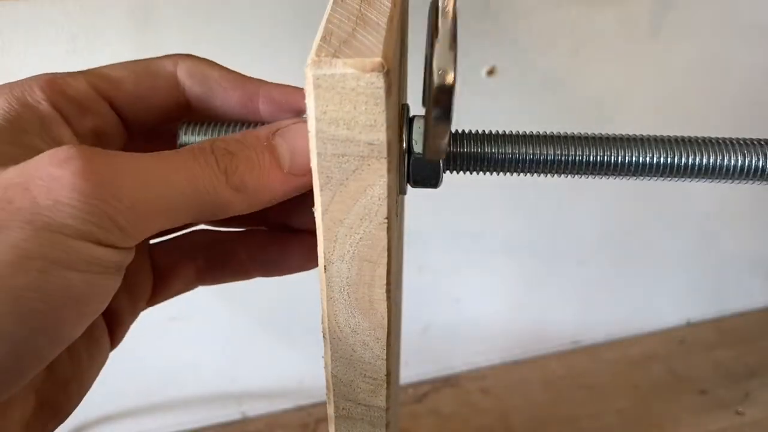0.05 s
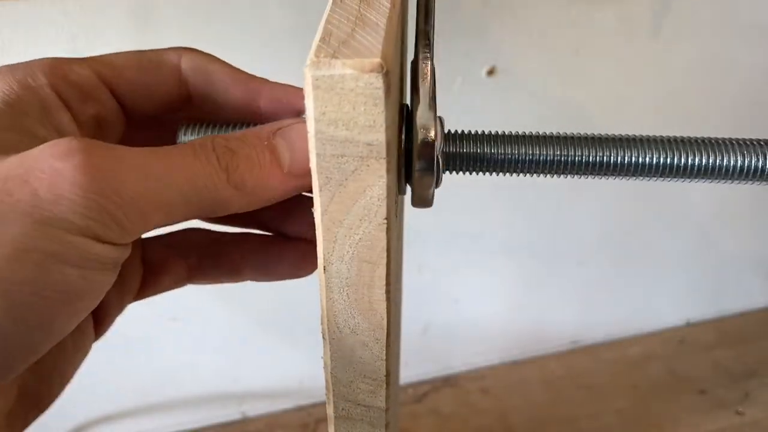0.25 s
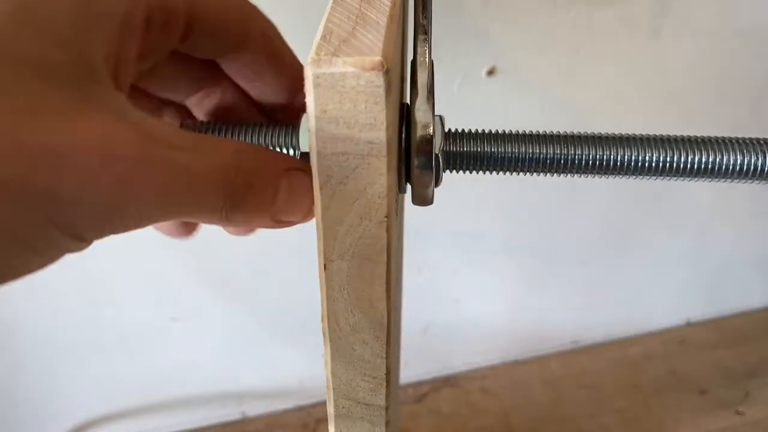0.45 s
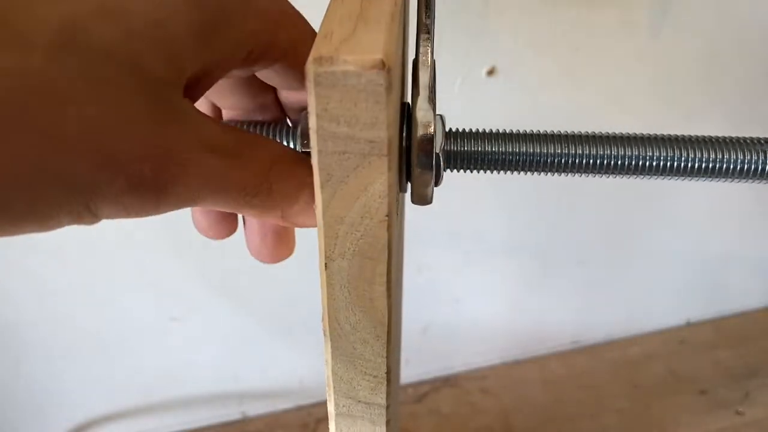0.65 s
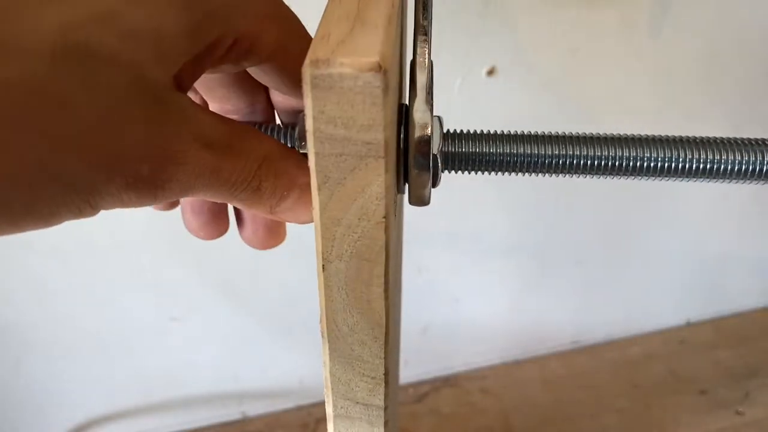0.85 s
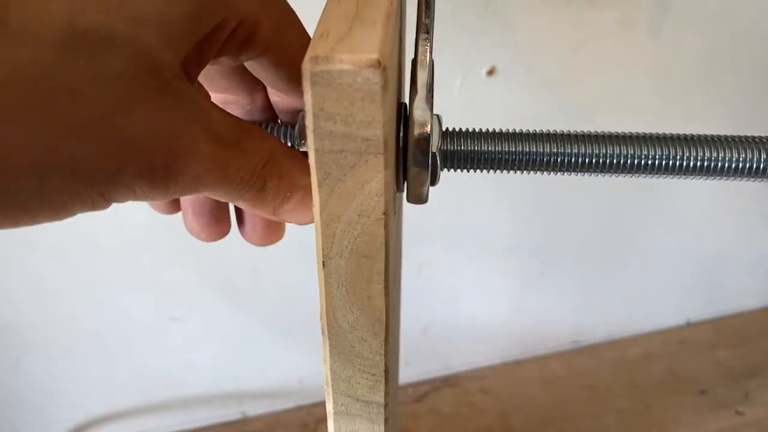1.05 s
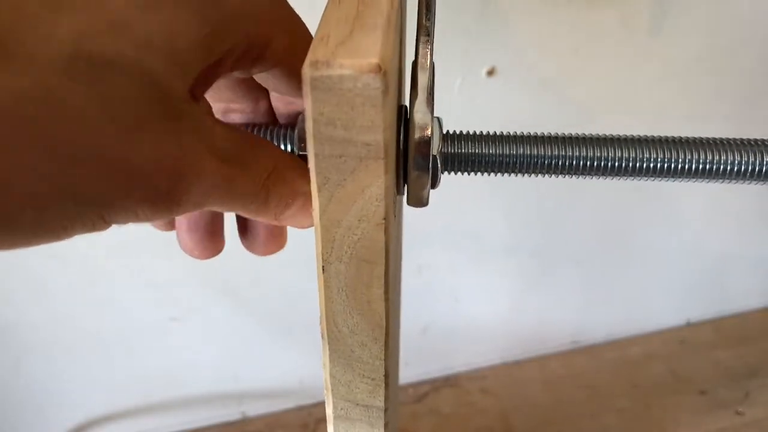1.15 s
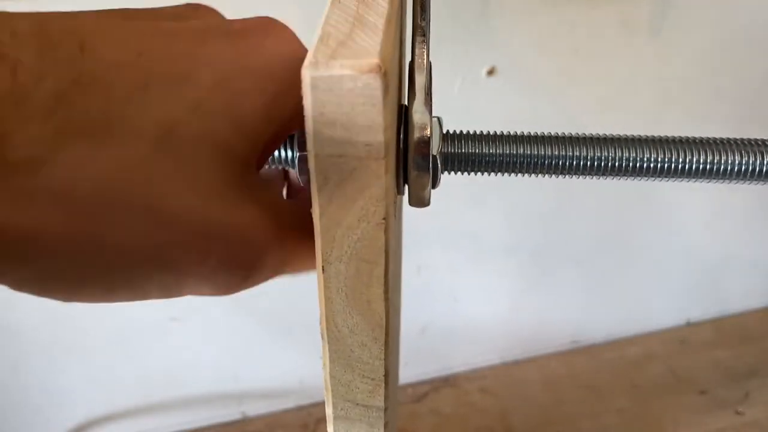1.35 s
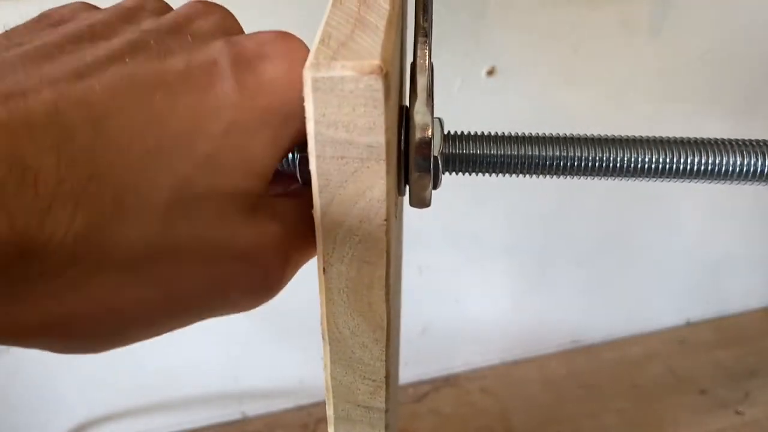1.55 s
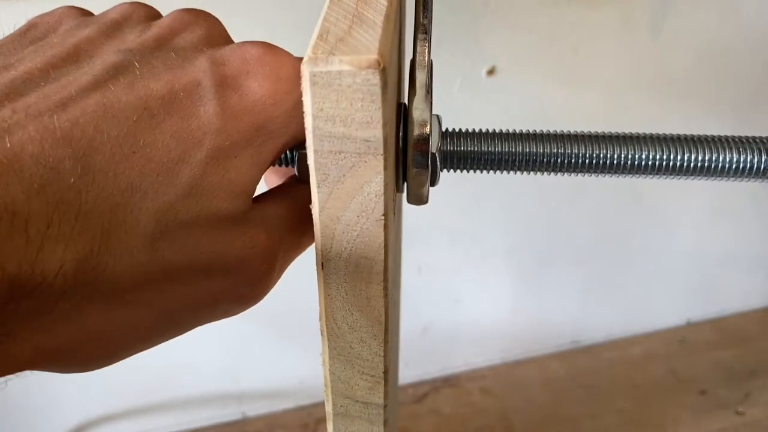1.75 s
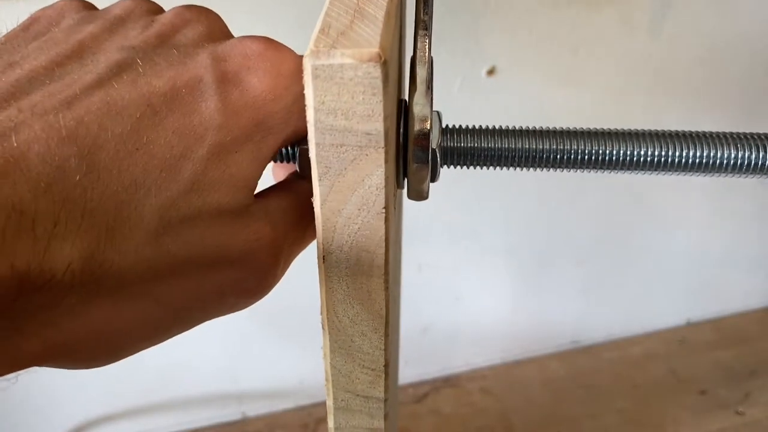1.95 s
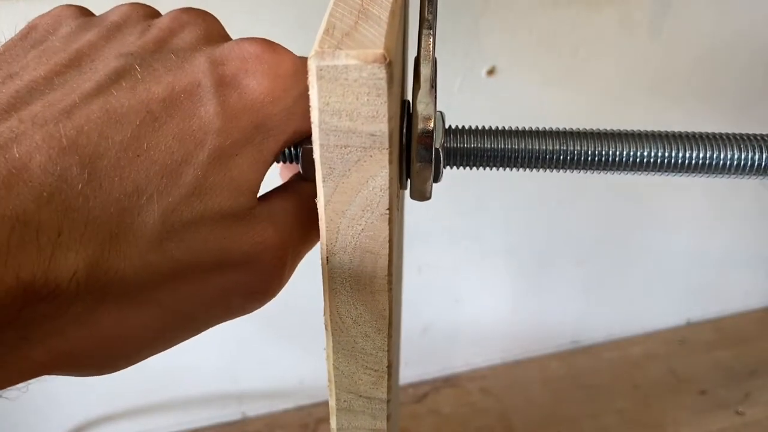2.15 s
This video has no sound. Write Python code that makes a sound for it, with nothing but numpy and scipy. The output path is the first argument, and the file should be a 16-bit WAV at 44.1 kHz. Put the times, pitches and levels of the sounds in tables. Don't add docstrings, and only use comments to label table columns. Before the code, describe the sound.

Close stereo phone pickup of a washer, nut and spanner clicking against wood and a threaded rod in two short bursts within the first second, followed by muffled floor thuds over faint room air.

```python
import sys
import numpy as np
from scipy import signal
from scipy.fft import rfft, irfft
from scipy.io import wavfile
from scipy.ndimage import uniform_filter1d

SR = 44100
rng = np.random.default_rng(int(sys.argv[2]) if len(sys.argv) > 2 else 0)


def put_to_file(sound):
    columns = np.atleast_2d(sound).T
    safe = np.clip(columns, -1, 1)
    whole_steps = np.round(safe * 32767)
    wavfile.write(sys.argv[1], SR, whole_steps.astype(np.int16))


def gain_from_db(level_db):
    decades = np.asarray(level_db, float) / 20
    return 10 ** decades


N = 97020
PORT_LAG = 12

# t/s, blow level/dB, chatter/s, colour f/Hz, ring level/dB
WASHER_HITS = [(0.0799, -30.5, 0.012, 3540, -10.5), (0.0832, -28.5, 0.004, 3080, -9),
               (0.0851, -31.5, 0.0058, 2000, -9.5), (0.086, -34, 0.0061, 910, -45),
               (0.1121, -30.5, 0.0057, 3040, -14), (0.116, -32.5, 0.0059, 1000, -20),
               (.1255, -36, 0.015, 2780, -13), (.134, -35, 0.021, 2160, -17),
               (0.176, -41, 0.0097, 1000, -15), (0.1803, -34.5, 0.013, 2860, -20),
               (.19, -36.5, 0.043, 1200, -23.5), (0.1942, -35.5, 0.002, 3000, -25),
               (0.1995, -32.5, 0.0034, 3220, -14), (0.2029, -31, 0.0028, 3020, -19.5),
               (0.207, -35, 0.0068, 2800, -19.5), (0.3542, -39.5, 0.0027, 3070, -45.5),
               (0.356, -36.5, 0.019, 497, -43.5)]
# t/s, blow level/dB, chatter/s, colour f/Hz, ring level/dB
SLAMS = [
    (.2189, -9.5, .0035, 3190, -21.5),
    (0.2227, -11, 0.0017, 2000, -20.5),
    (.229, -21, .007, 1700, -24),
    (0.8337, -12.5, 0.00093, 3010, -38),
    (0.836, -20, 0.0023, 2000, -51),
]
# t/s, blow level/dB, chatter/s, colour f/Hz, ring level/dB
NUT_HITS = [
    (0.6582, -38, 0.012, 4000, -1),
    (.666, -38, .01, 2800, -9),
]
# t/s, blow level/dB, chatter/s, colour f/Hz, ring level/dB
CATCH_HITS = [
    (0.6738, -31, 0.007, 1600, -24),
]
# t/s, blow level/dB, chatter/s, colour f/Hz, ring level/dB
ROD_HITS = [
    (0.7447, -43, 0.006, 3120, -9.5),
    (0.751, -40.5, 0.04, 1100, -43),
]
# t/s, blow level/dB, chatter/s, colour f/Hz, ring level/dB
SPANNER_HITS = [
    (0.8011, -32, 0.0063, 3240, -31),
    (0.8077, -27, 0.017, 4145, 1.5),
    (.8125, -27.5, 0.0059, 2500, -11.5),
    (0.8192, -25, 0.0066, 4670, -4.5),
    (.826, -29, 0.0065, 2000, -15.5),
    (1.87, -54, 0.0033, 3010, -45),
]
# f/Hz, level/dB, t60/s
BOARD = [(318, -10, .04), (490, -8, 0.04), (662, -5, 0.035), (870, -8, 0.03), (1005, -7, .03),
         (1192, -6, .03), (1412, -13, .03), (1675, -4, .035), (1770, 1, .028), (1900, -4, .028),
         (2235, 0, .028), (2480, -3, 0.035), (2985, -5, .035), (3500, -3, .03),
         (3720, -10.5, 0.03), (3963, -6.5, 0.049), (4056, -10, 0.015), (4230, -10, 0.034),
             (4600, -7.5, 0.025), (4825, -8, 0.02), (5530, -17, 0.065), (5780, -43, 0.04),
             (7340, -32, 0.075)]
# f/Hz, level/dB, t60/s
LOOSE = [(486, 0.5, 0.063), (856, 6, 0.027), (1218, -0.5, 0.056), (1584, 1.5, 0.018), (2000, -9, 0.022),
         (2430, 1, 0.027), (2837, -1.5, 0.024), (3094, -3.5, 0.039), (3310, 2.5, 0.015), (3585, -5, 0.11),
         (4014, -9, 0.031), (4740, -19.5, 0.011), (5030, -12, 0.058), (5630, -13, 0.11)]
# f/Hz, level/dB, t60/s
SEAT = [(845, -9, .04), (1200, -9, .04), (1560, -2, .025), (1640, 1, .03), (3080, -8, .03),
        (3530, -10, .03), (5230, -11, .04)]
# f/Hz, level/dB, t60/s
WASHER = [(5416, -10, 0.048), (6820, -5, 0.04), (7200, -12, 0.045), (7830, -16, .08), (9200, -12, .1),
          (11600, -17.5, 0.034), (13250, -24.5, .08), (15200, -24.5, .03), (10200, -17, .05),
          (12300, -4, .08)]
# f/Hz, level/dB, t60/s
SPANNER = [(2980, -5.5, 0.08), (4020, 4, 0.07), (5980, -10, 0.06), (6800, -20, 0.1), (9270, -30, 0.041),
           (11300, -20, .08), (12400, -22, 0.035), (5490, -15, 0.15), (7670, -8, 0.11)]
# f/Hz, level/dB, t60/s
NUT = [(4120, 3.5, 0.1), (4710, -3.5, 0.049), (5200, -9, 0.055), (7660, -26.5, 0.058)]
# f/Hz, level/dB, t60/s
ROD = [(3052, -1.5, 0.5), (3980, 7, 0.078), (5000, -4, 0.12), (8830, -21, 0.55), (11400, -25, .05),
       (5490, 0, .6), (7670, -6, .6)]
# t/s, length/s, level/dB
RUBS = [
    (.105, .04, 4),
    (.178, .038, 6),
    (1.275, .045, 1),
    (1.385, .045, -6),
    (.75, .045, -5),
    (1.595, .04, -8),
    (1.869, .007, 2),
]
# t/s, level/dB, settled pitch f/Hz,
# swell/s
THUDS = [(0.238, -40, 49.3, 0.019), (0.299, -34, 59.6, 0.01), (0.4332, -32, 72, 0.019),
         (0.465, -37, 71.6, 0.027), (0.6828, -43, 117.6, 0.036), (0.8378, -37, 99.5, 0.012),
         (0.9472, -41.5, 78.7, 0.037), (0.9656, -40.5, 113.3, 0.014), (1.1135, -35.5, 86.7, 0.034),
         (1.1127, -28.5, 124, 0.013), (1.1152, -24, 74.5, 0.016), (1.1199, -29, 51.4, 0.024),
         (1.1372, -35.5, 122.5, 0.0092), (1.1643, -39, 70.9, 0.052), (1.2345, -30.5, 107.5, 0.014),
         (1.249, -26, 59.7, 0.021), (1.267, -39.5, 76.6, 0.03), (1.303, -43.5, 68.6, 0.054),
         (1.432, -34, 123.2, 0.012), (1.4345, -23.5, 73.7, 0.015), (1.4358, -32.5, 47.4, 0.023),
         (1.4588, -47.5, 99.2, 0.031), (1.4657, -43, 73.4, 0.049), (1.4825, -37, 126.8, 0.019),
         (1.5526, -35, 67.8, 0.032), (1.5587, -34.5, 117.7, 0.027), (1.5838, -43, 114.2, 0.014),
         (1.6146, -30.5, 51, 0.013),
         (0.0817, -45.5, 188.6, 0.022), (0.2185, -32.5, 237.2, 0.0069), (0.2241, -38, 123, 0.0056),
            (0.2497, -38, 89.8, 0.013), (0.3741, -40.5, 120.6, 0.022), (0.4326, -38.5, 121.8, 0.0066),
            (0.6762, -44.5, 199.8, 0.023), (0.685, -41.5, 80, 0.012), (0.848, -40.5, 180, 0.01),
            (0.8554, -44, 123.6, 0.023), (1.018, -45, 61, 0.01), (1.1259, -35.5, 59.4, 0.012),
            (1.1536, -49.5, 116, 0.026), (1.238, -45.5, 68.7, 0.022), (1.4517, -40, 130.4, 0.011),
            (1.4789, -42.5, 204.4, 0.019), (1.5224, -43.5, 92, 0.022), (1.5529, -48.5, 159, 0.032)]
# f/Hz, t60/s
ROOM = [(250, 0.77), (700, 0.34), (1800, 0.27), (4600, 0.26), (9000, 0.21)]
# f/Hz, level/dB per Hz
AIR = [(25, -0.5), (90, -2), (260, -16), (410, -19.5), (600, -28), (6500, -36.5), (9000, -46.5),
       (16000, -57.5)]
# f/Hz, level/dB per Hz
AIR_APART = [(30, -10), (86, 4.5), (259, -0.5), (470, -1), (1800, -10.5), (2400, -26.5), (3300, -24),
             (3600, -73)]


def evened(x):
    return x / np.sqrt(np.mean(x ** 2) + 1e-20)


def read(points, hz):
    f, value = np.transpose(points)
    return np.interp(np.log(hz + 1), np.log(f + 1), value)


def add(mix, s, sound):
    part = mix[round(s * SR):][:len(sound)]
    part += sound[:len(part)]


def band(x, hz, width):
    return signal.lfilter(*signal.iirpeak(hz, hz / width, SR), x)


def ring(modes, crowd, scatter_db, longest):
    hz, db, t60 = np.transpose(modes)[:, :, None]
    t = np.arange(round(min(2 * longest, 1 / 3) * SR)) / SR
    t60 = np.minimum(t60, longest)
    draw = rng.random((3,) + hz.shape)
    hz = hz * (1 + crowd * (2 * draw[0] - 1))
    db = db + scatter_db * (2 * draw[1] - 1)
    bloom_turns = 1.5
    bloom = 1 - np.exp(-(t * hz / bloom_turns) ** 2)
    return gain_from_db(db - 60 * t / t60) * bloom * np.sin(2 * np.pi * (hz * t + draw[2]))


def contacts(chatter):
    n = SR // 18
    draw, t = rng.random((3, n)), np.arange(n) / SR
    contacts_per_s, spread_db = 5000, 2.5
    strength = gain_from_db(-spread_db * np.log(draw[2] + 0.024))
    ticks = (draw[0] < contacts_per_s / SR) * np.sign(draw[1] - .5) * strength
    rise = np.minimum(t / (0.1 * chatter), 1)
    ticks = ticks * rise * np.clip(1.3 - t / chatter, 0, 1.3) ** 1.21
    return ticks / (np.linalg.norm(ticks) + 1e-9)


def knock(board, steel, start, blow_db, chatter, colour_hz, ring_db, free=False):
    ticks = contacts(chatter)
    t = np.arange(len(ticks)) / SR
    sound = np.zeros(SR // 3)

    modes = ring(board, crowd=0.012, scatter_db=1.5, longest=.045)
    rung = signal.fftconvolve(modes, ticks[None], axes=1)
    share = np.linalg.norm(modes, axis=1) / (np.linalg.norm(rung, axis=1) + 1e-9)
    add(sound, 0, share @ rung / 2)

    crack_db, crack_t60 = 4, 0.025
    crack = rng.standard_normal(len(t))
    for _ in range(2):
        crack = band(crack, colour_hz, 1.06 * colour_hz)
    crack = signal.lfilter(*signal.butter(2, 5630, fs=SR), crack)
    crack = crack * gain_from_db(crack_db - 60 * t / crack_t60)
    add(sound, 0, signal.fftconvolve(ticks, crack))

    snap_db, snap_t60 = -9.5 + .4 * min(ring_db, -10), .005
    add(sound, 0, gain_from_db(snap_db - 60 * t / snap_t60) * np.gradient(rng.standard_normal(len(t))))

    pair = ring(steel + steel, crowd=0 if free else .003, scatter_db=0, longest=2 if free else .25)
    chime = pair[:len(steel)].sum(0) + 0.27 * pair[len(steel):].sum(0)
    swell = np.minimum(np.arange(len(chime)) / (0.069 * chatter * SR), 1)
    add(sound, 0, gain_from_db(ring_db) * chime * swell)
    return start, gain_from_db(blow_db) * sound


def rod_tap(*hit):
    s, sound = knock(LOOSE, ROD, *hit, free=True)
    stopped_s, grip_s = 0.06, 0.011
    return s, sound * np.clip((stopped_s - np.arange(len(sound)) / SR) / grip_s, .35, 1)


def rub(start, length, db):
    n = round(length * SR)
    hiss = rng.standard_normal(SR // 10)[:n]
    for _ in range(2):
        hiss = band(hiss, 7500, 9000)
    return start, gain_from_db(-63 + db) * np.hanning(n) ** .5 * evened(hiss)


def thuds():
    out, t = np.zeros(N), np.arange(SR // 6) / SR
    sag, sag_s = 0.71, 0.0093
    for s, db, hz, swell in THUDS:
        turns = hz * (t + sag * sag_s * (1 - np.exp(-t / sag_s)))
        envelope = (t / swell * np.exp(1 - t / swell)) ** 2
        add(out, s, gain_from_db(db) * envelope * np.sin(2 * np.pi * turns))
    boom_db, boom_t60, boom_hz = -10, 0.48, 164
    t = np.arange(SR // 2) / SR
    tail = rng.standard_normal(len(t)) * gain_from_db(-60 * t / boom_t60) * np.minimum(t / 0.022, 1)
    tail = evened(tail) / np.sqrt(len(t))
    lift = signal.lfilter(*signal.butter(1, boom_hz, "high", fs=SR), out)
    return out + gain_from_db(boom_db) * signal.fftconvolve(lift, tail)[:N]


def room(x):
    taps = np.zeros(SR // 2)
    at = np.arange(120, len(taps) - 20, 20)
    taps[at + rng.integers(0, 20, at.shape)] = rng.choice([-1., 1.], at.shape)
    hz, t, z = signal.stft(taps, SR, nperseg=256)
    tail = signal.istft(z * gain_from_db(-60 * t / read(ROOM, hz)[:, None]), SR, nperseg=256)[1]
    return signal.fftconvolve(x, tail / np.linalg.norm(tail))[:N]


def air(spectrum, db, patchy_db):
    frames, hz = N // 512 + 5, np.fft.rfftfreq(2048, 1 / SR)
    a, b, patches = rng.standard_normal((frames, 1025, 3)).T
    patches = uniform_filter1d(patches, size=16, axis=0)
    patches = evened(uniform_filter1d(patches, size=8, axis=1))
    z = (a + 1j * b) * gain_from_db(read(spectrum, hz)[:, None] + patchy_db * patches)
    return gain_from_db(db) * evened(signal.istft(z, nperseg=2048, noverlap=1536)[1][:N])


def scene():
    steel = np.zeros(N)
    for board, metal, hits in ((BOARD, WASHER, SLAMS), (LOOSE, WASHER, WASHER_HITS),
                               (LOOSE, SPANNER, SPANNER_HITS), (LOOSE, NUT, NUT_HITS),
                               (SEAT, NUT, CATCH_HITS)):
        for hit in hits:
            add(steel, *knock(board, metal, *hit))
    for hit in ROD_HITS:
        add(steel, *rod_tap(*hit))
    for row in RUBS:
        add(steel, *rub(*row))
    low = thuds()
    mid = steel + gain_from_db(-13.5) * room(steel) + low + air(AIR, -50.5, patchy_db=.7)
    near = np.roll(steel, PORT_LAG) + gain_from_db(-8.5) * room(steel)
    side = gain_from_db(-4.5) * band(near, 1000, 580)
    side = side + gain_from_db(-21) * (np.roll(low, 130) - np.roll(low, 60))
    side = side + air(AIR_APART, -63.5, patchy_db=0.6)
    return np.array([mid + side, mid - side])


def roll_off(x):
    return signal.sosfilt(signal.butter(12, 16950, fs=SR, output="sos"), x)


def record(dry):
    low_cut_hz, edge_hz, side_to_hz, lag_from_hz = 45, 16400, 3480, 7500
    hz = np.fft.rfftfreq(N, 1 / SR)
    mid = rfft((dry[0] + dry[1]) / 2) / (1 + (low_cut_hz / (hz + 1)) ** 4) * (hz < edge_hz)
    side_gain = np.where(hz < side_to_hz, 1, gain_from_db(-2) * (hz < lag_from_hz))
    side = rfft((dry[0] - dry[1]) / 2) * side_gain
    half = np.exp(-1j * np.pi * hz * PORT_LAG / SR * (hz > lag_from_hz))
    mix = irfft(np.array([mid * half + side, mid / half - side]), N)
    return roll_off(mix)


dry = scene()
out = record(dry)
put_to_file(out)
```